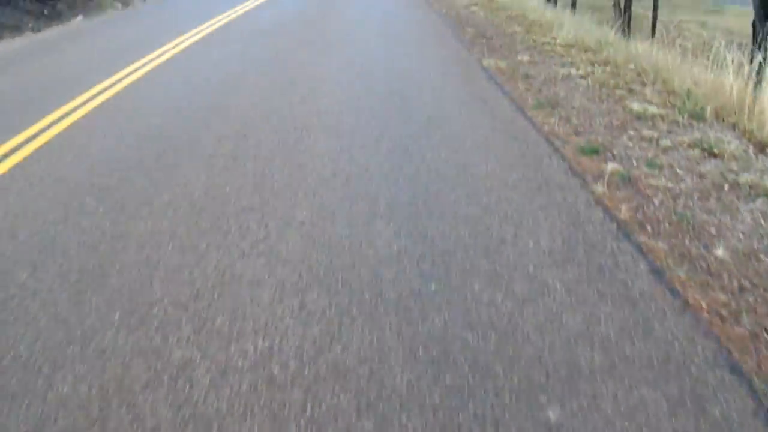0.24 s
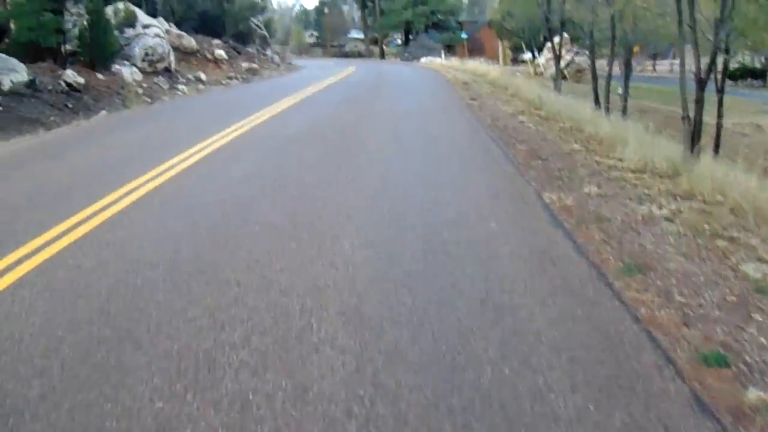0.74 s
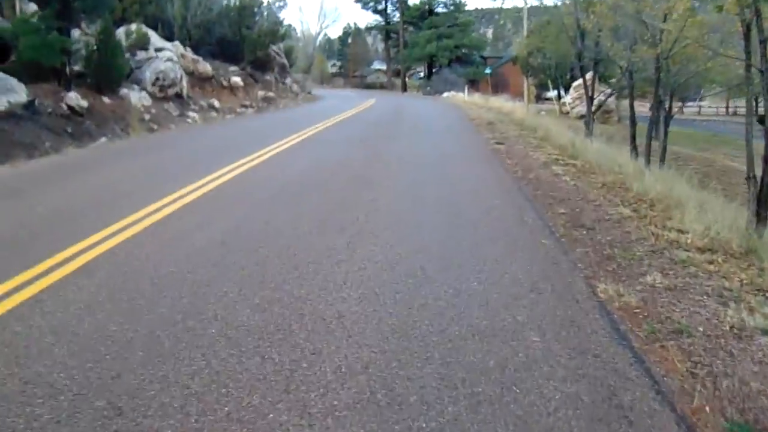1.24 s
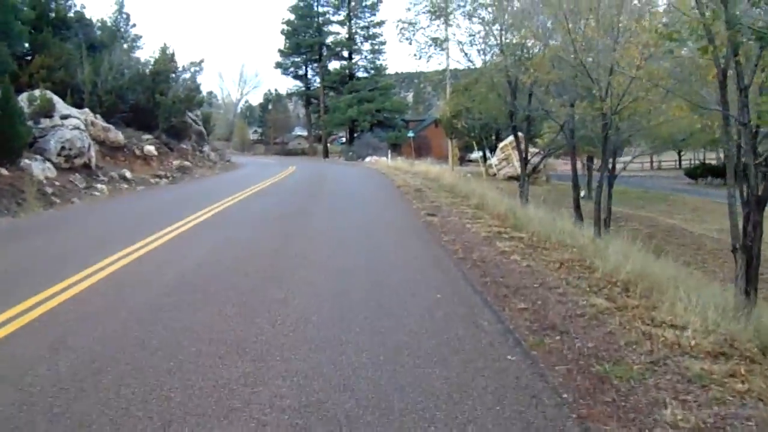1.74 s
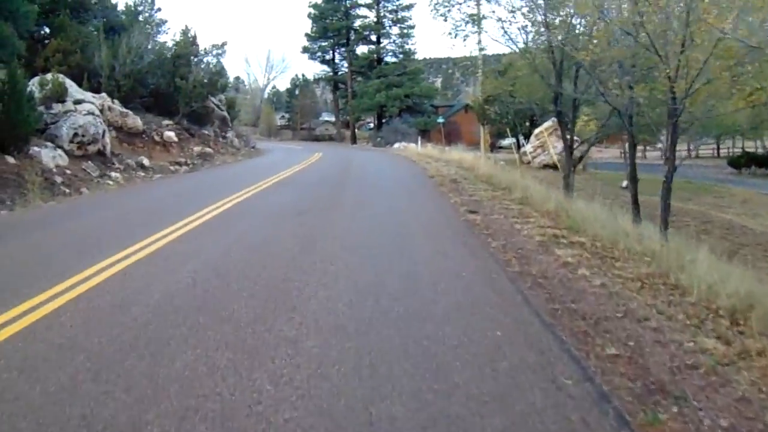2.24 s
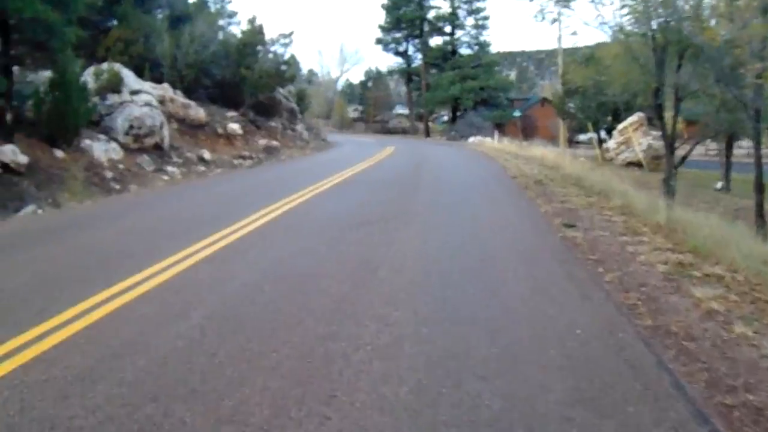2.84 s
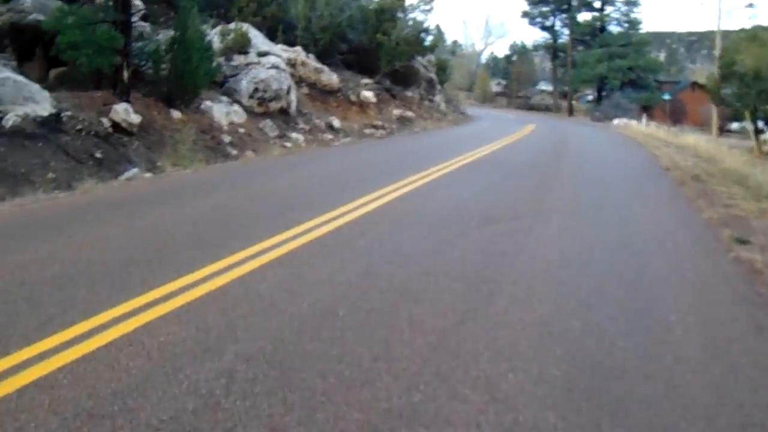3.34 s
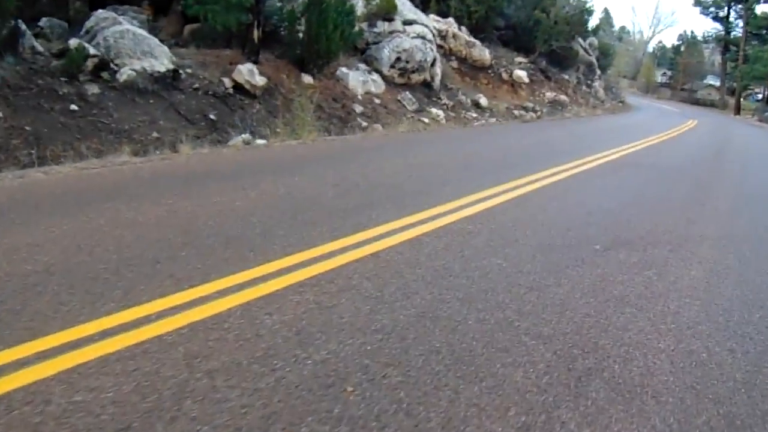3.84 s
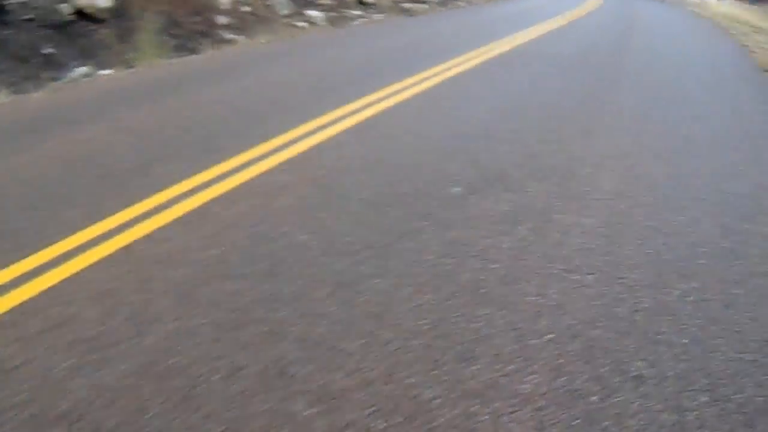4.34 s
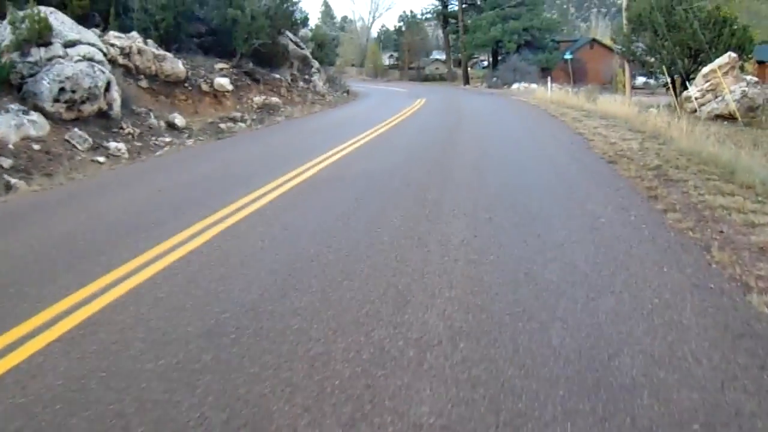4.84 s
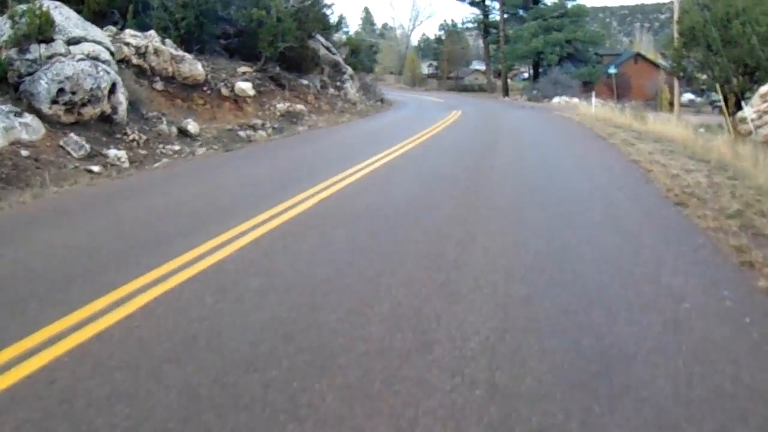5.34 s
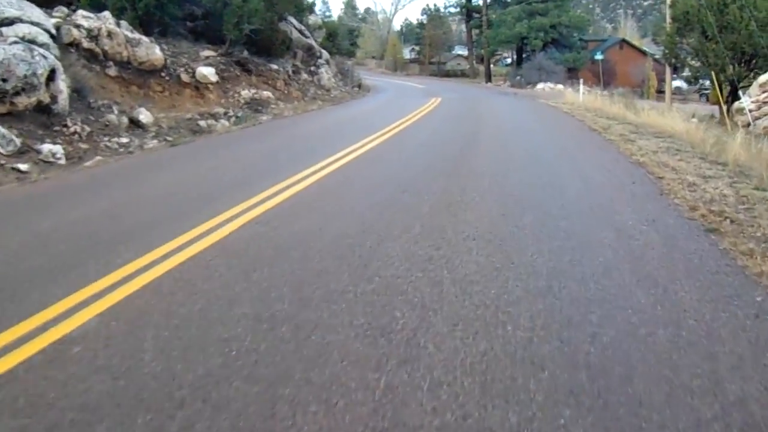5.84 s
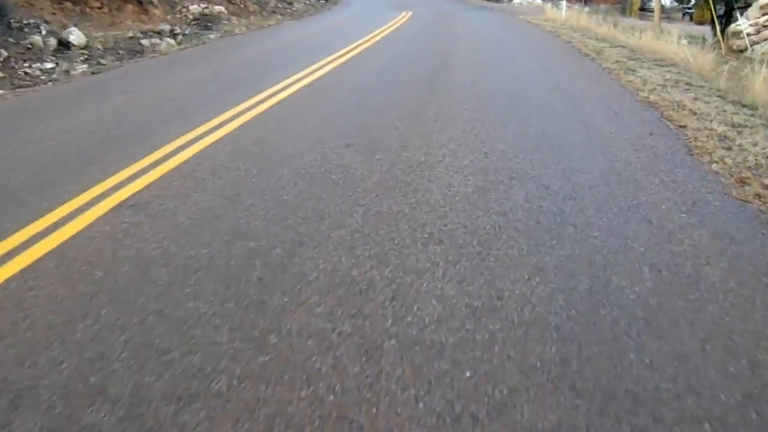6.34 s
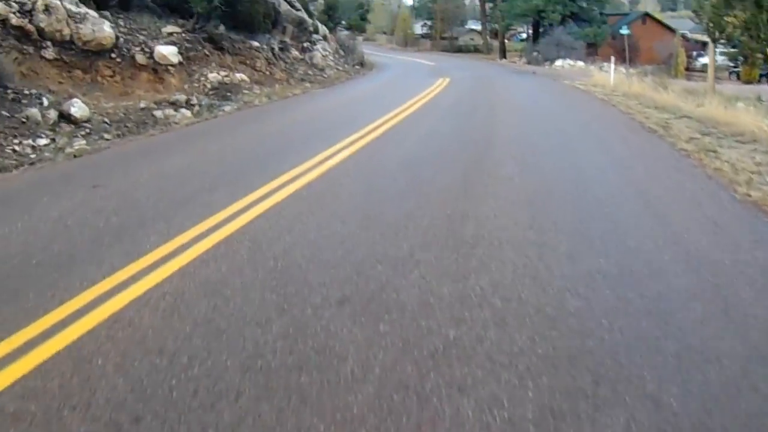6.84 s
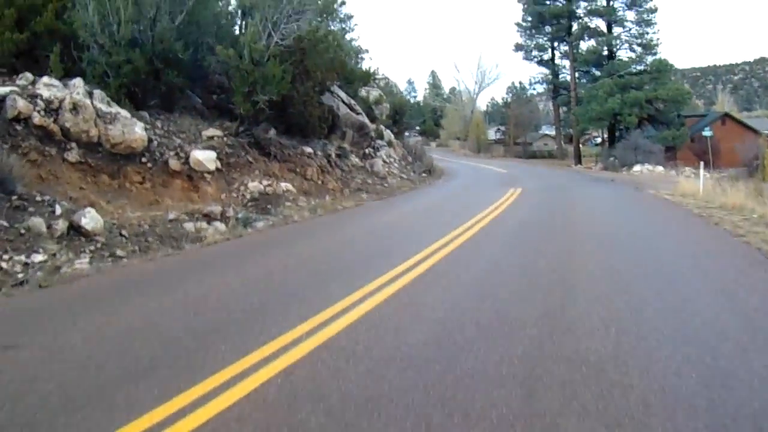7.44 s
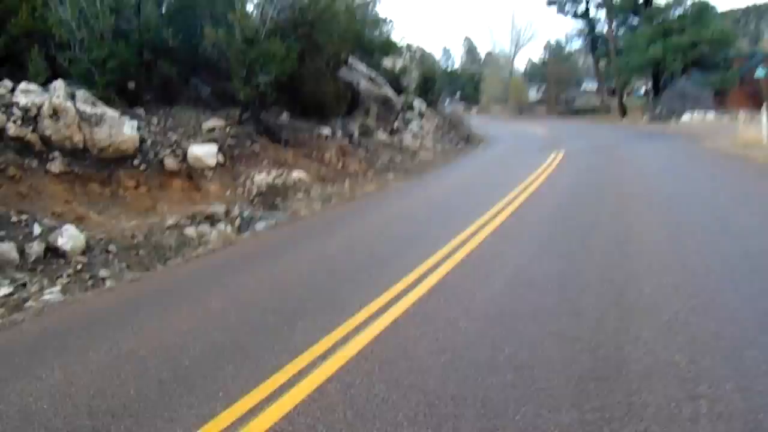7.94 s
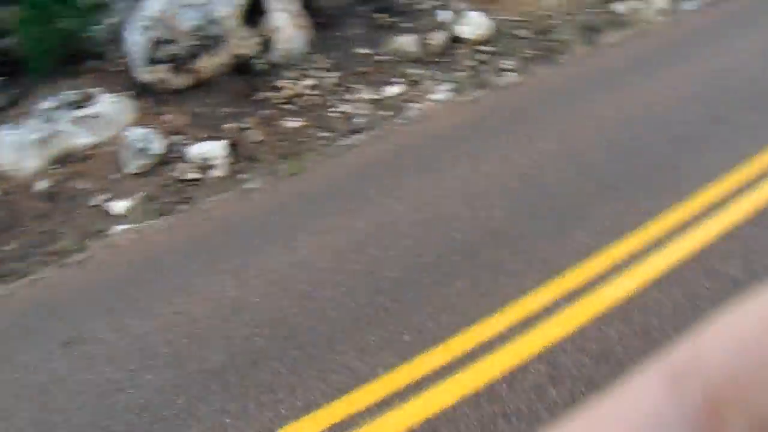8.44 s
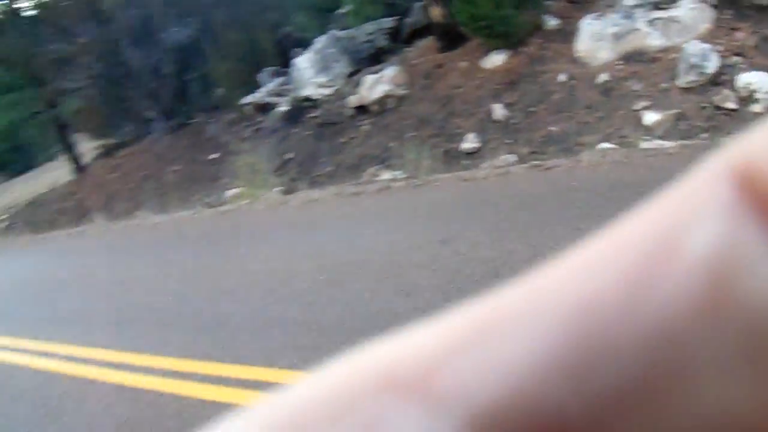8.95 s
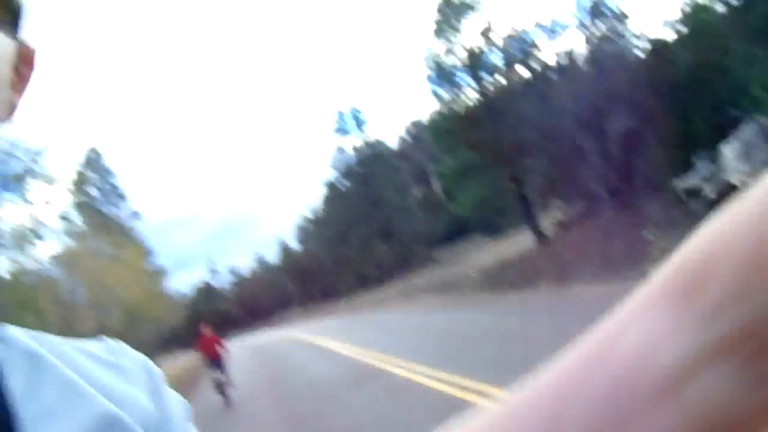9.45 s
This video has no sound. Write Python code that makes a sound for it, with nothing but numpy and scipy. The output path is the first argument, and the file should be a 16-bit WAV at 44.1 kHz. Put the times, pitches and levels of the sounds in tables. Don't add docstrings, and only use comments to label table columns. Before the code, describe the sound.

Close, gritty skateboard ride outdoors: steady woody drone, clusters of hard clacks and metal ticks, dull thumps, and bursts of low headwind rumble.

```python
import sys
import numpy as np
from scipy import signal
from scipy.io import wavfile
from scipy.ndimage import uniform_filter1d

SR = 44100
rng = np.random.default_rng(int(sys.argv[2]) if len(sys.argv) > 2 else 0)


def level_to_linear(level):
    exponent = np.asarray(level, float) / 20
    return 10 ** exponent


def store_wav(level_fs):
    pcm = np.round(np.clip(np.atleast_2d(level_fs), -1, 1) * 32767)
    wavfile.write(sys.argv[1], SR, pcm.T.astype(np.int16))


N = 426888

# [t/s, hum level/dB, rattle
# level/dB]
RIDE = [(0.0, -22.5, -51), (0.4, -22, -41.5), (0.62, -23.5, -56), (1.1, -22.5, -46), (1.94, -20, -42),
        (2.4, -21.5, -46.5), (2.75, -19.5, -43.5), (3.5, -21, -44.5), (4.42, -21, -43.5),
        (4.91, -17.5, -43), (5.25, -25, -50.5), (5.9, -23, -50), (7.06, -18, -41), (7.7, -20, -46),
        (8.1, -25.5, -55.5), (9.15, -27, -49.5), (9.33, -26.5, -55), (9.68, -22.5, -57)]
# [t/s, level change/dB]
LOADS = [(0.27, 5), (0.38, 1), (0.44, -2.5), (1.70, -8.5), (1.78, 6.5), (3.61, -2.5), (3.77, 7), (4.77, -1),
         (4.93, 3), (5.01, 6.5), (5.12, 1), (6.01, -2), (6.42, 4), (6.471, 6.5), (6.85, 2.5), (7.14, 2),
         (7.36, 2.5), (7.65, 0), (7.69, -4.5), (7.84, 2.5), (8.65, 9), (8.94, 0), (8.98, 5), (9.06, -4.5)]
# [f/Hz, width/Hz, level/dB]
DECK_MODES = [(133, 68.6, -17.5), (243.5, 100, -14), (360.4, 63, -6.5), (400.7, 31, -1), (436.7, 27.8, -1),
              (492, 69, -13), (585, 155, -16), (771, 94, -19), (984, 212, -32)]
# [f/Hz, width/Hz, level/dB]
AXLE_MODES = [(1290, 115, 10.5), (1630, 50, 11.5), (1813, 177, 12), (2170, 510, 0.5), (2108, 220, 0),
              (3050, 1710, 3.5), (3580, 380, 6)]
# [f/Hz, width/Hz, level/dB]
WASHER_MODES = [(3480, 430, -0.5), (4600, 330, 2.5), (5240, 1860, 2), (5990, 660, 6.5), (6490, 2500, 5),
                (7900, 10100, 1.5), (11940, 3100, -1.5)]
# [f/Hz, width/Hz, level/dB]
FINGER_MODES = [(5600, 1800, -4), (8470, 1700, -2), (10680, 520, 2)]
# [start t/s, hold/s, level/dB]
RUBS = [(0.08, .18, -43.5), (0.28, .07, -51), (0.36, 0.025, -38), (1.26, 0.04, -42), (1.41, 0.018, -35),
        (1.63, .02, -56), (1.75, .02, -54), (2.05, 0.22, -50), (2.60, 0.3, -51), (3.14, 0.08, -45.5),
        (3.79, .46, -50), (4.29, .03, -47), (4.39, 0.59, -56), (7.33, 0.12, -45.5), (7.48, 0.14, -42.5),
        (7.60, 0.37, -47.5), (7.77, 0.035, -44), (7.95, 1, -52), (8.80, 0.065, -49), (8.93, 0.18, -46.5),
        (9.15, .07, -52), (9.515, 0.025, -45)]
# [rate/(1/s), length/ms, level/dB]
EDDIES = [(25.8, 36, 13.5), (82, 18, -31), (220.3, 2.44, -8)]
# [start t/s, hold/s, level/dB]
GUSTS = [(1.02, 1, -39.5), (1.12, 0.17, -27.5), (1.39, .07, -32.5), (1.52, 0.078, -24), (1.87, 0.097, -31),
         (2.14, 0.2, -37), (2.36, 0.025, -26), (2.52, 0.17, -24.5), (2.68, 0.058, -26), (3.09, 0.068, -31),
         (3.22, 0.016, -22), (3.29, .04, -22), (3.35, .14, -22.5), (3.61, 0.12, -17.5), (3.835, .02, -22.5),
         (3.92, 0.18, -26), (4.10, 0.17, -42), (4.93, 0.11, -14.5), (5.06, 0.22, -15), (5.31, 0.055, -14),
         (5.45, 0.78, -39), (7.05, .33, -38.5), (7.39, 0.043, -25), (7.51, 0.13, -14.5), (7.66, 0.25, -16),
         (7.90, .19, -13.5), (8.16, 0.61, -39), (8.66, 0.092, -17.5), (8.87, 0.067, -24.5),
         (9.25, .15, -26.5), (9.45, 0.2, -22)]
# [t/s, peak level/dB, length/ms]
POPS = [(3.31, -1, 2.6), (3.397, -7, 2.9), (3.688, -9, 3.0), (3.716, -8, 3.2), (3.838, -10, 3.0),
        (3.988, -12, 1.9), (5.103, -9, 3.7), (5.175, -4, 2.3), (5.330, -9, 3.1), (7.893, -9, 2.7),
        (7.917, -9, 3.0), (8.026, -6, 3.2), (8.793, 0, 1.64)]
# [t/s, peak level/dB, middle share/dB]
KNOCKS = [(0.0903, -13, -13), (1.6319, -7, -16), (1.8017, -13.5, -21), (2.1181, -14.5, -9.5),
          (2.2287, -13.5, -18), (2.5516, -8.5, -14), (2.6665, -12.5, -25), (2.862, -22, -15),
          (2.962, -14, -14), (3.1343, -14.5, -12), (3.1607, -12, -17), (3.1996, -16, -18),
          (3.4181, -20, -10.5), (4.1415, -21, -17), (4.2435, -13, -17), (4.385, -12.5, -15),
          (4.4346, -12, -20), (4.4883, -6.5, -19), (4.5795, -9, -13), (4.598, -24, -5),
          (4.648, -10.5, -15.5), (4.6668, -14, -15), (4.788, -19, -30), (4.9701, -22, -9),
          (5.107, -16, -11), (6.5695, -12, -34), (6.725, -12, -20), (7.01, -18.5, -16),
          (7.0923, -16, -12.5), (8.4594, -12, -20)]
# [t/s, peak level/dB, bright share/dB]
TICKS = [(0.1193, -16, -21), (0.4798, -17.5, -13.5), (1.17, -18, -14), (1.261, -13, -9.5),
         (1.7504, -27.5, 0.5), (1.8655, -13.5, -17), (2.0597, -25, -6), (2.0872, -14, -19),
         (3.3096, -18, -14), (3.7523, -23.5, -3), (4.29, -18, -17), (4.5436, -34.5, 3), (4.6882, -14, -22),
         (4.812, -23, -11), (4.8304, -14, -15), (5.1577, -18, -16), (6.0791, -23, -10), (6.1238, -17, -17),
         (6.168, -17, -16), (6.4117, -19.5, -6), (6.6099, -23, -7), (6.9222, -12.5, -15),
         (7.0404, -19, -11), (7.151, -29, 0), (7.3154, -13, -9), (7.3567, -19, -8), (7.541, -16.5, -13),
         (7.5584, -16, -9), (7.7754, -14.5, -10.5), (9.5044, -22, -19)]
# [t/s, peak level/dB, middle share/dB, bright share/dB]
MORE_KNOCKS = [(2.821, -26, -14, -13), (3.1434, -12, -15, -20), (7.32, -18, -15, -13), (7.3254, -16, -17, -11),
               (7.331, -18, -8, -14), (7.344, -20, -20, -12), (7.3644, -26, -20, -19), (8.4352, -55, -5, -2),
               (8.4716, -15.5, -14.5, -18), (9.1591, -27, -18, -12), (9.2918, -25, -16, -17),
               (9.614, -28.5, -15, -12), (9.6382, -34, -8, -9)]
# [first bounce t/s, gap/s, peak level/dB]
BOUNCES = [(0.128, 0.015, -16), (0.556, 0.0056, -27), (0.862, 0.014, -30), (0.984, .009, -28),
           (2.096, .011, -19), (3.173, .011, -23), (3.215, 0.012, -16), (4.259, 0.012, -17),
           (4.394, 0.0091, -11), (4.445, .010, -21), (4.496, 0.0067, -18.5), (4.619, 0.0086, -18),
           (4.692, 0.0082, -25), (4.930, 0.013, -23), (6.533, 0.038, -19), (6.642, 0.031, -17),
           (6.734, 0.0093, -19), (6.764, 0.018, -20), (6.891, 0.0079, -20), (6.936, 0.025, -13.5),
           (7.047, 0.0034, -27)]
# [t/s, peak level/dB]
THUMPS = [(0.207, -17), (0.364, -5.5), (0.48, -10), (0.678, -9.5), (0.856, -9), (0.715, -6), (0.816, -34),
          (1.023, -10), (1.147, -7.5), (1.274, -14), (2.438, -5), (2.643, -7), (2.675, -3.5), (2.803, -18),
          (2.842, -3), (3.163, -11), (3.312, -13), (3.638, -4), (3.864, -9), (4.312, -12), (4.385, -37),
          (4.997, -19), (5.123, -15), (6.782, -24), (7.317, -5)]
# [t/s, length/ms, f/Hz, level/dB]
SQUEAKS = [
    (2.538, 32, 2280, -33),
    (2.565, 50, 2340, -48),
    (2.536, 26, 3500, -39),
    (5.165, 30, 1600, -42),
]

LOAD_S, RATTLE_FEELS_LOAD = 0.009, 0.72
BUZZ_DB, BUZZ_FOLLOWS = -45, 0.93
HISS_DB, HISS_FOLLOWS = -57, 0.9
GRIP_DB, GRIP_FOLLOWS = -55.5, 0.74
RUB_RISE_DB_PER_S, RUB_FALL_DB_PER_S = 350, 302
CHATTER_PER_S, CHATTER_T60_MS, CHATTER_DB = 85, 10, -53.5
BREEZE_DB, GUST_RISE_DB_PER_S, GUST_FALL_DB_PER_S = -47, 300, 380
FLUTTER_DB, FLUTTER_PER_S = 2.2, 24
KNOCK_T60_S, KNOCK_BRIGHT_DB, TICK_MIDDLE_DB = 0.016, -23, -13
BOUNCE_LOSS_DB, BOUNCE_MIDDLE_DB, BOUNCE_BRIGHT_DB = 1, -16.5, -19
TURN_AWAY_S, TURN_TAKES_S, HAND_SHADOW_DB = 7.9, 0.25, -3


def rms_one(x):
    return x / np.sqrt(np.mean(x ** 2) + 1e-20)


def in_time(rows):
    s, *columns = np.transpose(rows)
    return [np.interp(np.arange(N) / SR, s, column) for column in columns]


def drift(rate):
    r = np.exp(-40 * np.pi * rate / SR)
    noise = rng.standard_normal(N // 20 + 2002)
    slow = signal.lfilter([1], [1, -2 * r, r * r], noise)[2000:]
    return np.interp(np.arange(N) / 20, np.arange(len(slow)), rms_one(slow))


def modes(x, table, patchy_db=0):
    out = np.zeros(N)
    for k, (hz, width_hz, level_db) in enumerate(table):
        r = np.exp(-np.pi * width_hz / SR)
        top = [(1 - r * r) / 2, 0, (r * r - 1) / 2]
        bottom = [1, -2 * r * np.cos(2 * np.pi * hz / SR), r * r]
        rung = signal.lfilter(top, bottom, x)
        sign = (-1) ** k
        out += sign * level_to_linear(level_db + patchy_db * drift(34.7)) * rung
    return out


def clicks(per_s, spread_db):
    happens = rng.random(N) < per_s / SR
    return happens * level_to_linear(spread_db * np.minimum(rng.exponential(1, N), 3))


def dying(x, t60_ms):
    return signal.lfilter([1], [1, -level_to_linear(-60000 / (t60_ms * SR))], x + 1e-18)


def push(length_ms):
    return np.hanning(max(int(length_ms * SR / 500), 3))


def swells(rows, rise_db_per_s, fall_db_per_s, rest_db):
    t = np.arange(0, N + 64, 64) / SR
    s, hold, db = np.transpose(rows)[:, :, None]
    rise = rise_db_per_s * np.clip(s - t, 0, None)
    fall = fall_db_per_s * np.clip(t - s - hold, 0, None)
    loudest = (db - rise - fall).max(axis=0)
    return np.maximum(np.interp(np.arange(N) / SR, t, loudest), rest_db)


def loads():
    t = np.arange(N) / SR
    return sum(db * np.exp(-0.5 * ((t - s) / LOAD_S) ** 2) for s, db in LOADS)


def jolt_train(per_s, t60_ms, spread_db):
    bumps = clicks(per_s * level_to_linear(4.0 * drift(4.4)), spread_db)
    return rms_one(dying(dying(bumps, t60_ms), 1.8))


def shaken(jolts, share, flicker_db):
    return rng.standard_normal(N) * (1 + share * jolts) * level_to_linear(flicker_db * drift(78.0))


def deck(jolts, hum_db):
    low = modes(shaken(jolts, 0.26, 1.15), DECK_MODES[:5], patchy_db=1.02)
    high = modes(shaken(jolts, 0.3, 2.76), DECK_MODES[5:], patchy_db=1.5)
    treble_cut = signal.butter(2, 1900, fs=SR, output="sos")
    return level_to_linear(hum_db) * rms_one(signal.sosfilt(treble_cut, low + high))


def axles(jolts, buzz_db):
    loose = jolts + jolt_train(120.0, 9.0, 3.5)
    rattle = shaken(loose, 0.62, 2.5)
    return level_to_linear(buzz_db - 2.0) * rms_one(modes(rattle, AXLE_MODES, patchy_db=1.5))


def grit(jolts, hiss_db):
    loose = 0.6 * jolts + jolt_train(140.0, 6.0, 3.5)
    crackle = shaken(loose, 1.8, 2.6)
    return level_to_linear(hiss_db + 2.0) * rms_one(modes(crackle, WASHER_MODES, patchy_db=-5.5))


def chatter(swing_db):
    hits = clicks(CHATTER_PER_S * level_to_linear(0.4 * swing_db + 7.0 * drift(5.4)), 1.9)
    ticks = dying(dying(hits, CHATTER_T60_MS), 1.3)
    axle = [(hz, width_hz, db + 7.5) for hz, width_hz, db in AXLE_MODES[2:]]
    rung = modes(ticks * rng.standard_normal(N), axle + WASHER_MODES, patchy_db=3.5)
    return level_to_linear(CHATTER_DB + 0.3 * swing_db) * rms_one(rung)


def wind():
    lumps = np.zeros(N)
    for per_s, ms, db in EDDIES:
        pushes = signal.fftconvolve(clicks(per_s, 5.0), push(ms))[:N]
        lumps += level_to_linear(db) * rms_one(pushes)
    soft = signal.butter(2, 150, fs=SR, output="sos")
    rumble = rms_one(signal.sosfilt(soft, rng.standard_normal(N)))
    leak = signal.butter(2, 35, "high", fs=SR, output="sos")
    gusts = rms_one(signal.sosfilt(leak, lumps - np.mean(lumps) + level_to_linear(3.0) * rumble))
    no_hiss = signal.butter(4, 450, fs=SR, output="sos")
    gusts = signal.sosfilt(no_hiss, gusts)
    gust_db = swells(GUSTS, GUST_RISE_DB_PER_S, GUST_FALL_DB_PER_S, BREEZE_DB)
    gusts *= level_to_linear(gust_db + FLUTTER_DB * drift(FLUTTER_PER_S))
    pop_leak = signal.butter(1, 60, "high", fs=SR, output="sos")
    for s, peak_db, ms in POPS:
        pop = np.zeros(N)
        pop[round(s * SR)] = level_to_linear(peak_db + 0.5)
        gusts += signal.sosfilt(pop_leak, np.convolve(pop, push(ms))[:N])
    return gusts


def fingers(swing_db):
    grip_db = GRIP_DB + GRIP_FOLLOWS * swing_db
    rub_db = swells(RUBS, RUB_RISE_DB_PER_S, RUB_FALL_DB_PER_S, grip_db)
    tremble_db = 1.3 * drift(40.0)
    return level_to_linear(rub_db - 4.5 + tremble_db) * rms_one(modes(rng.standard_normal(N), FINGER_MODES))


def knocks():
    hits = [(s, db, middle_db, KNOCK_BRIGHT_DB) for s, db, middle_db in KNOCKS]
    hits += [(s, db, TICK_MIDDLE_DB, bright_db) for s, db, bright_db in TICKS]
    hits += MORE_KNOCKS
    for s, gap, db in BOUNCES:
        for k in range(3):
            hits.append((s + k * gap, db - k * BOUNCE_LOSS_DB, BOUNCE_MIDDLE_DB, BOUNCE_BRIGHT_DB))
    dull, middle, bright = np.zeros((3, N))
    t = np.arange(1500) / SR
    for s, peak_db, middle_db, bright_db in hits:
        start = round(s * SR)
        at = slice(start, start + 1500)
        rise = 1 - np.exp(-t / 0.0005)
        burst = rng.standard_normal(1500) * rise * level_to_linear(peak_db - 60 * t / KNOCK_T60_S)
        dull[at] += burst
        middle[at] += burst * level_to_linear(middle_db)
        bright[at] += burst * level_to_linear(bright_db)
    axle = level_to_linear(-5.0) * modes(dull, AXLE_MODES[:4]) + level_to_linear(-4.0) * modes(dull, AXLE_MODES[4:])
    washers = level_to_linear(12.0) * modes(middle, WASHER_MODES[:4]) + level_to_linear(13.0) * modes(bright, WASHER_MODES[4:])
    return axle + washers


def thumps():
    bumps = np.zeros(N)
    for s, peak_db in THUMPS:
        bumps[round(s * SR)] = level_to_linear(peak_db + 26.5)
    bursts = dying(bumps, 40.0) * rng.standard_normal(N)
    return modes(bursts, DECK_MODES[5:] + [(1250, 490, -35.5)])


def squeaks():
    out = np.zeros(N)
    for s, ms, hz, db in SQUEAKS:
        swell = push(ms / 2)
        tone = np.sin(2 * np.pi * hz * np.arange(len(swell)) / SR)
        start = round(s * SR)
        out[start:start + len(swell)] += level_to_linear(db) * swell * tone
    return out


def scene():
    hum_db, rattle_db = in_time(RIDE)
    load_db = loads()
    swing_db = rattle_db - rattle_db.mean() + RATTLE_FEELS_LOAD * load_db
    turned = np.clip((np.arange(N) / SR - TURN_AWAY_S) / TURN_TAKES_S, 0, 1)
    shadow_db = HAND_SHADOW_DB * turned
    jolts = jolt_train(70.0, 15.0, 3.1)
    mix = deck(jolts, hum_db + load_db)
    mix += axles(jolts, BUZZ_DB + BUZZ_FOLLOWS * swing_db)
    mix += grit(jolts, HISS_DB + HISS_FOLLOWS * swing_db + shadow_db)
    mix += level_to_linear(shadow_db) * chatter(swing_db)
    mix += wind() + fingers(swing_db)
    mix += level_to_linear(-4.0) * knocks() + thumps() + squeaks()
    return mix[None, :]


def thin_treble(x, from_hz, below_db, drop_db):
    hz, _, frames = signal.stft(x, SR, nperseg=256)
    band = (hz // 1000).astype(int)
    power = [np.mean(np.abs(frames[band == k]) ** 2, axis=0) for k in range(band.max() + 1)]
    power = np.array(power) + 1e-18
    recent = np.exp(uniform_filter1d(np.log(power), size=40, axis=1))
    dips = power < recent * level_to_linear(2 * below_db)
    weak = dips[band] & (hz >= from_hz)[:, None]
    return signal.istft(frames * np.where(weak, level_to_linear(drop_db), 1), SR, nperseg=256)[1][:N]


def low_pass(x):
    return signal.sosfilt(signal.butter(12, 12390, fs=SR, output="sos"), x)


def record(dry):
    rounded = 1.3 * np.tanh(dry[0] / 1.3)
    thinned = thin_treble(rounded, 3000, -5.5, -10)
    edge = signal.cheby2(16, 31, 11300, fs=SR, output="sos")
    top = signal.butter(8, 11800, fs=SR, output="sos")
    finished = signal.sosfilt(top, signal.sosfilt(edge, thinned))
    return low_pass(finished[None, :])


dry = scene()
out = record(dry)
store_wav(out)
```